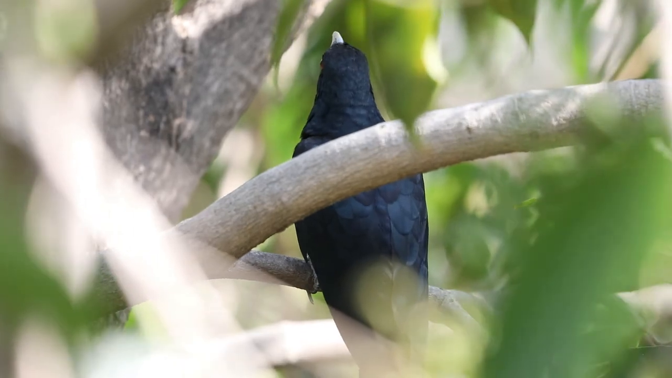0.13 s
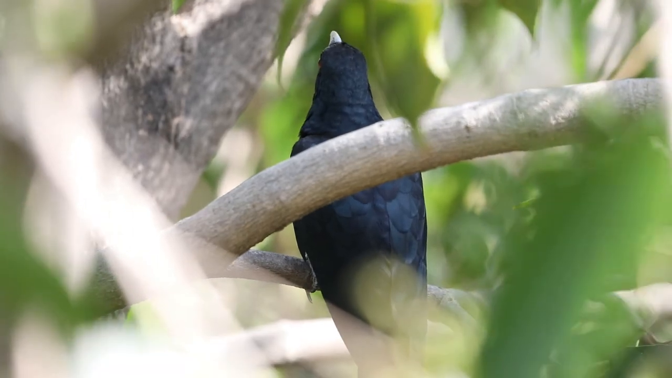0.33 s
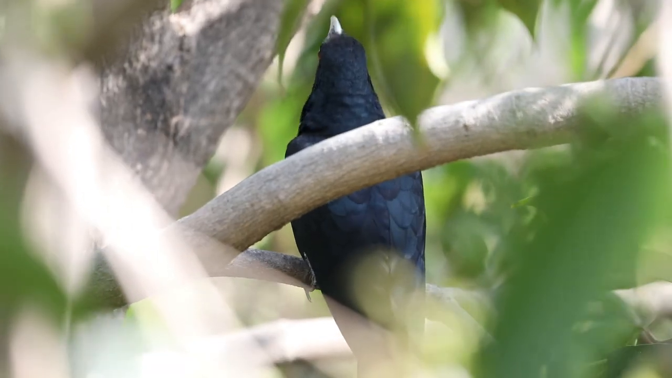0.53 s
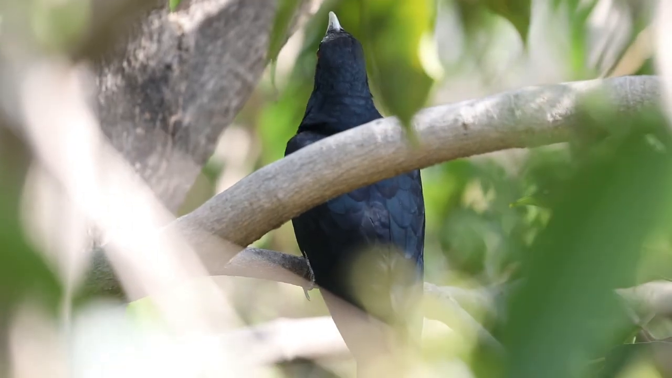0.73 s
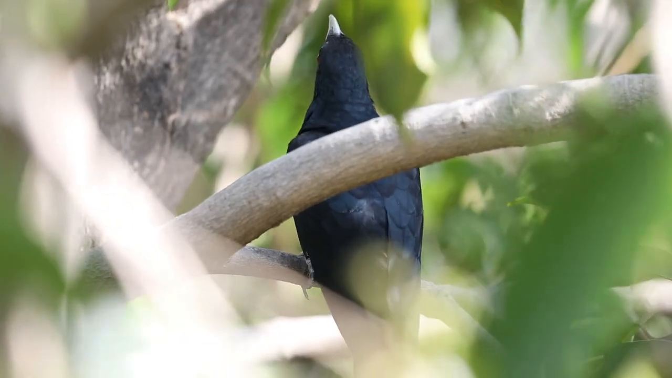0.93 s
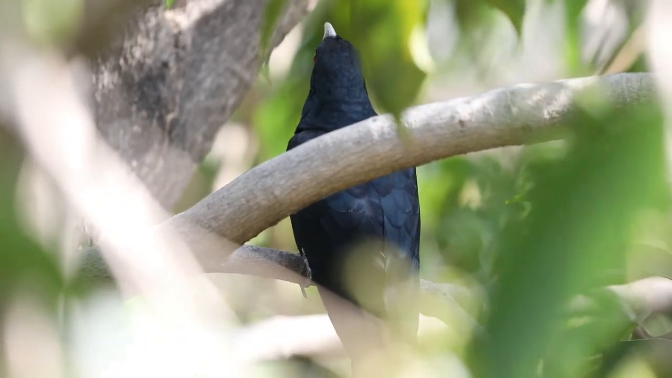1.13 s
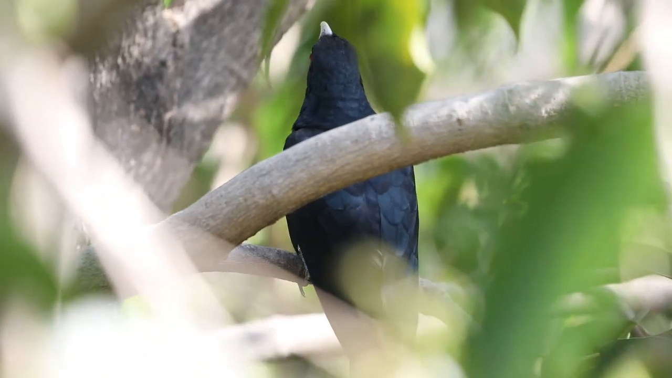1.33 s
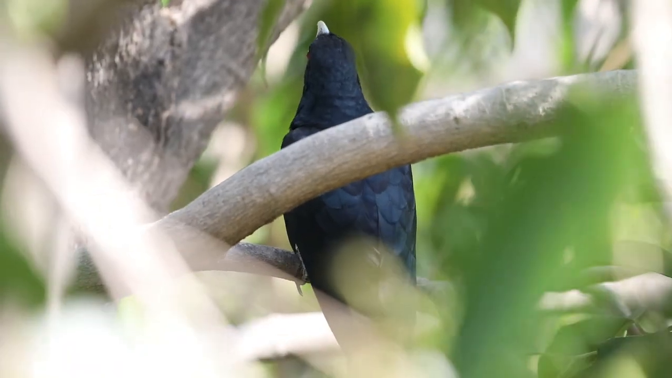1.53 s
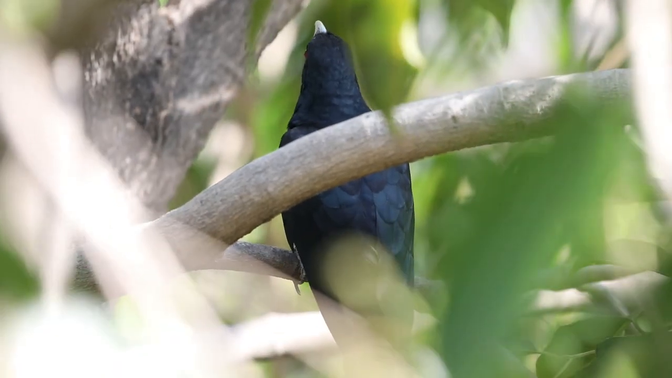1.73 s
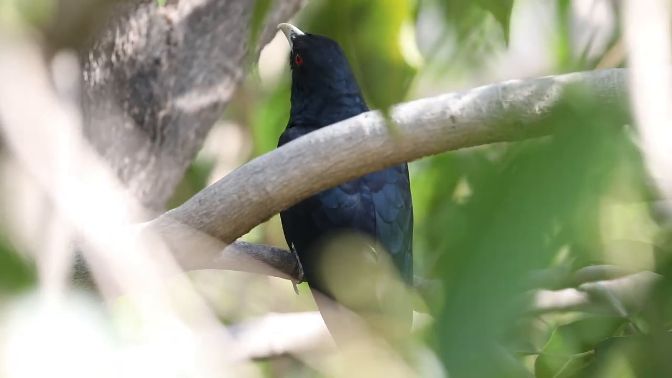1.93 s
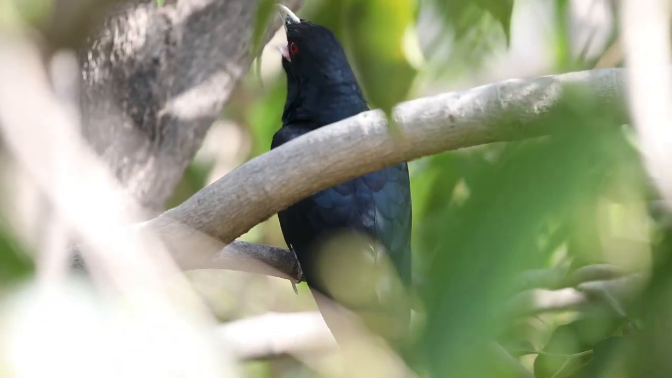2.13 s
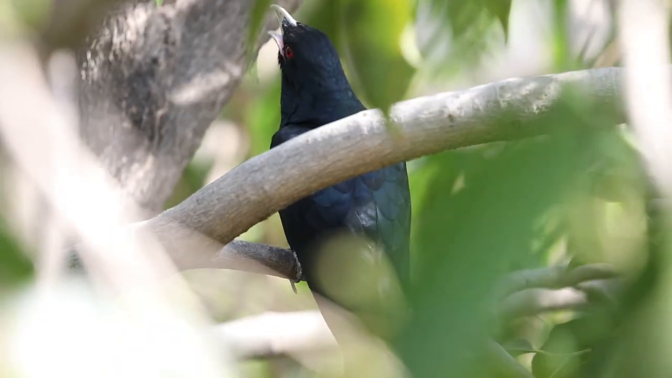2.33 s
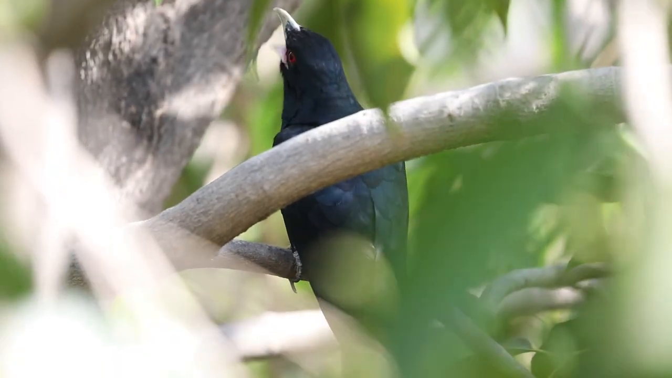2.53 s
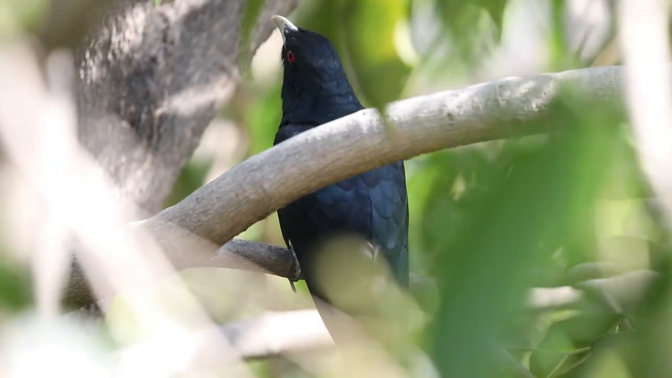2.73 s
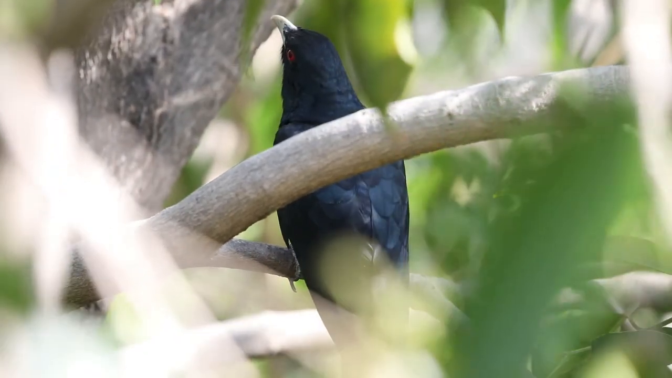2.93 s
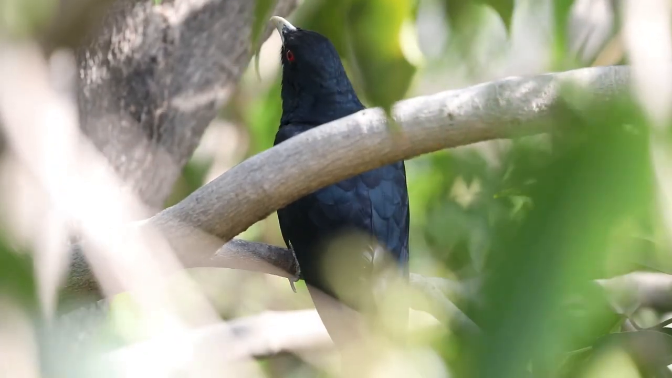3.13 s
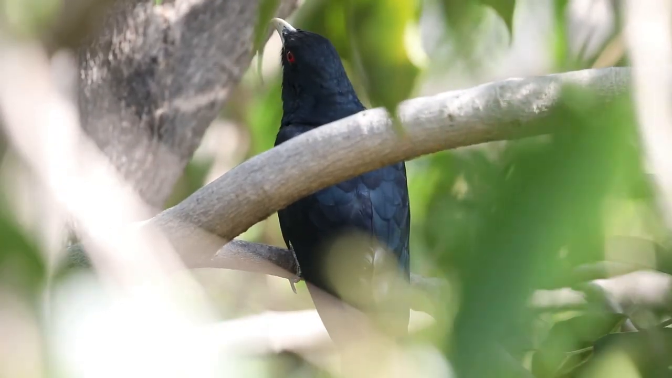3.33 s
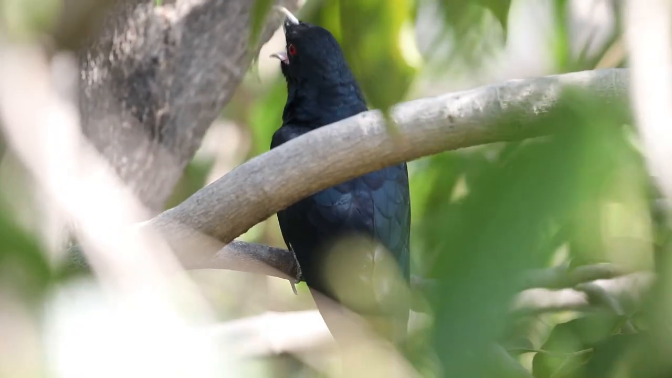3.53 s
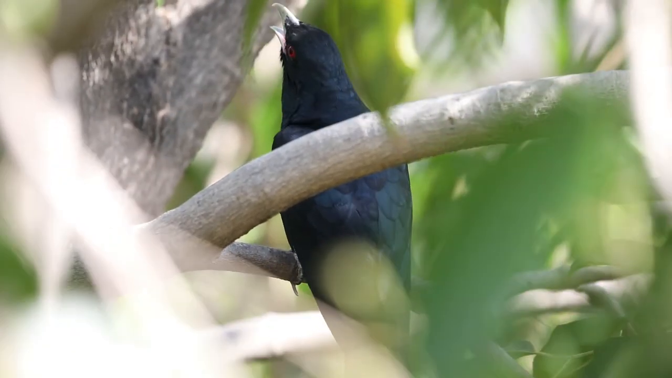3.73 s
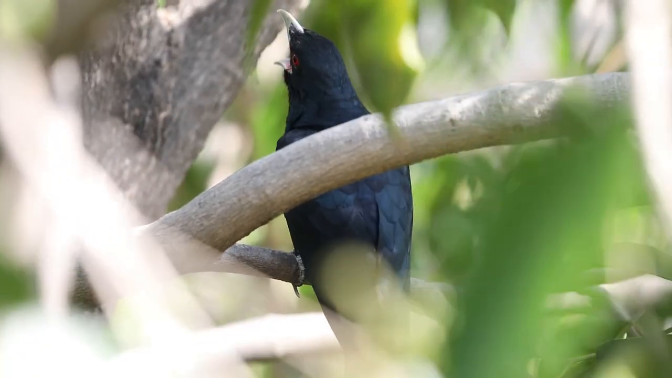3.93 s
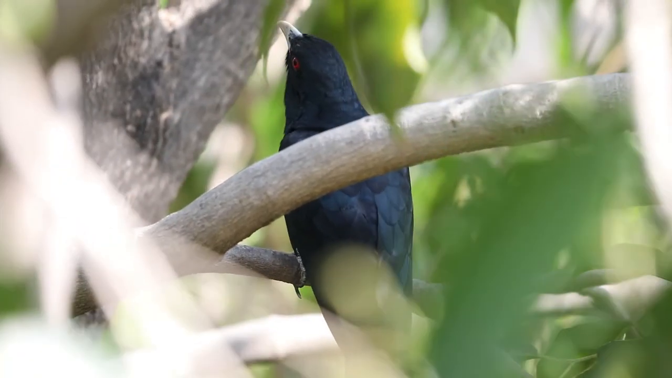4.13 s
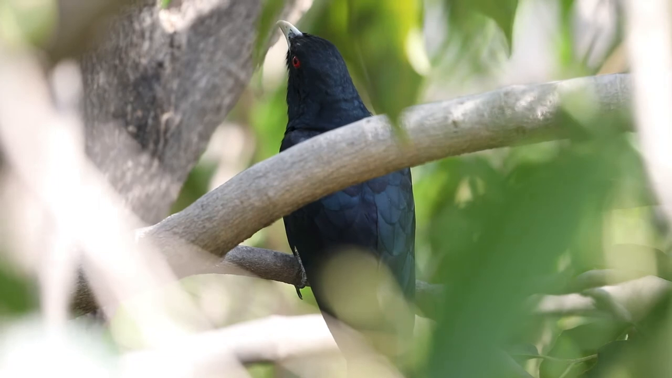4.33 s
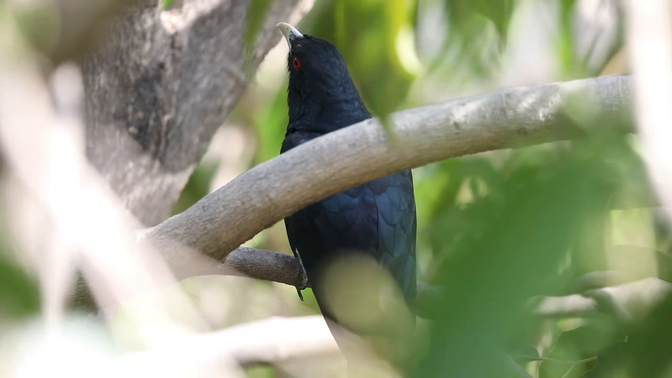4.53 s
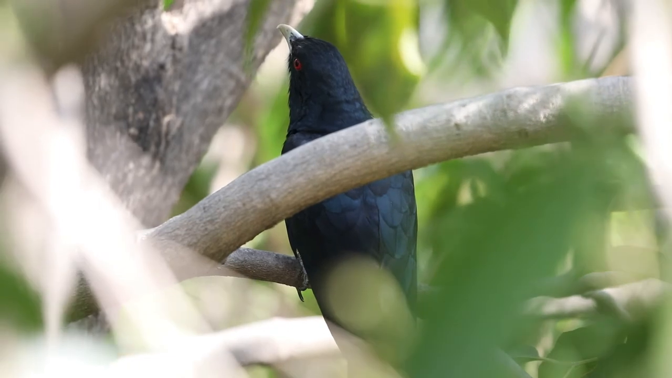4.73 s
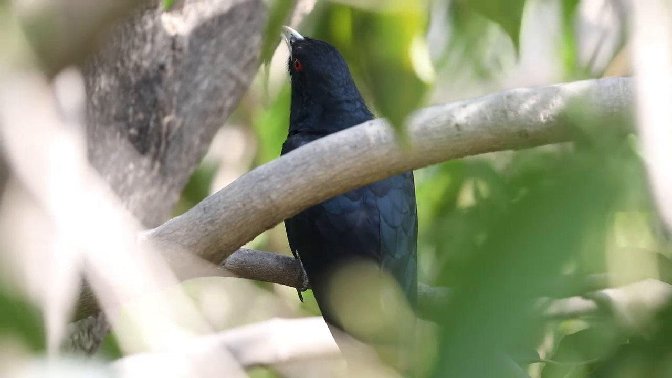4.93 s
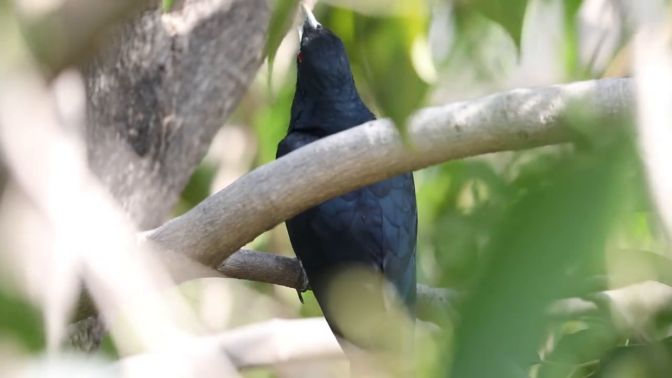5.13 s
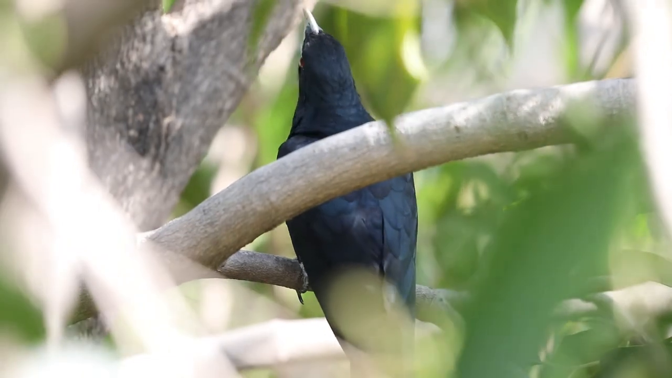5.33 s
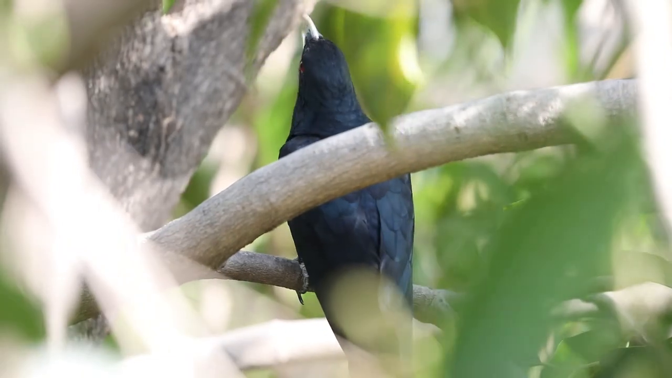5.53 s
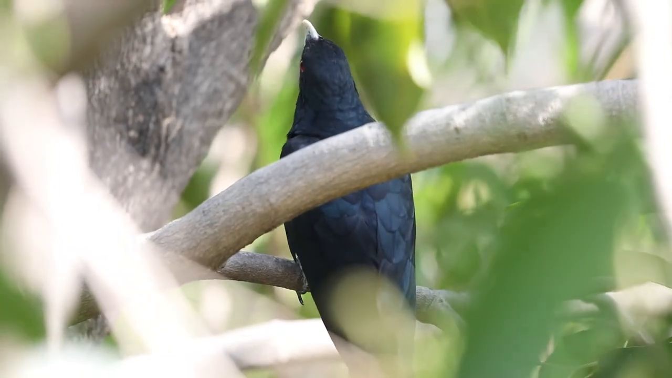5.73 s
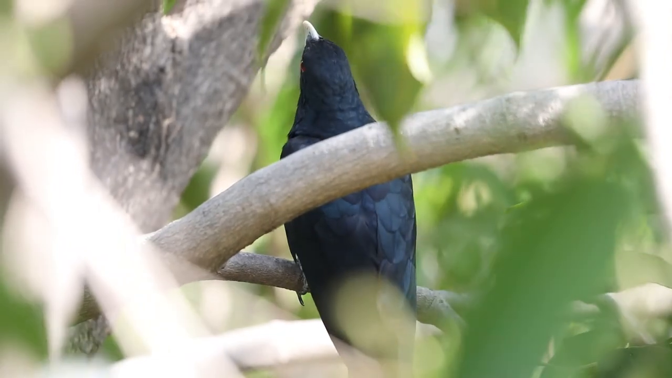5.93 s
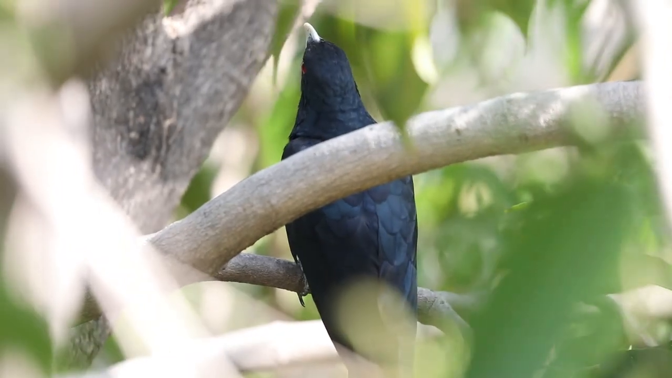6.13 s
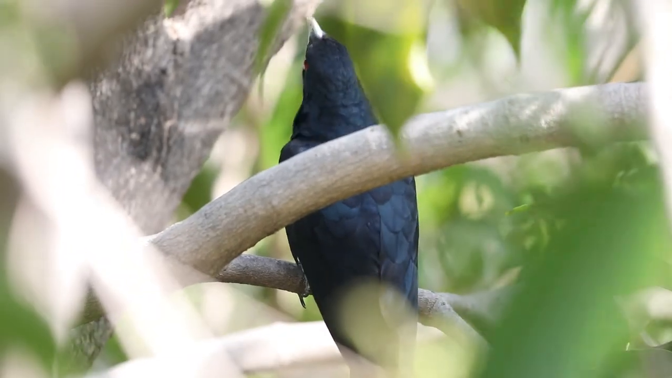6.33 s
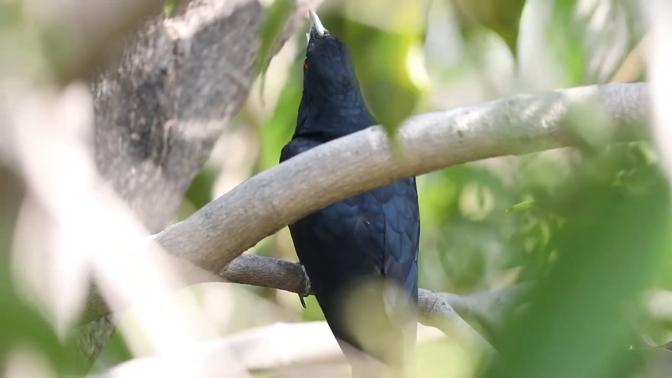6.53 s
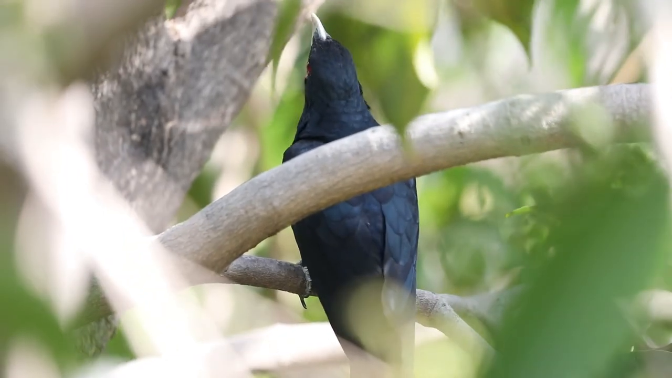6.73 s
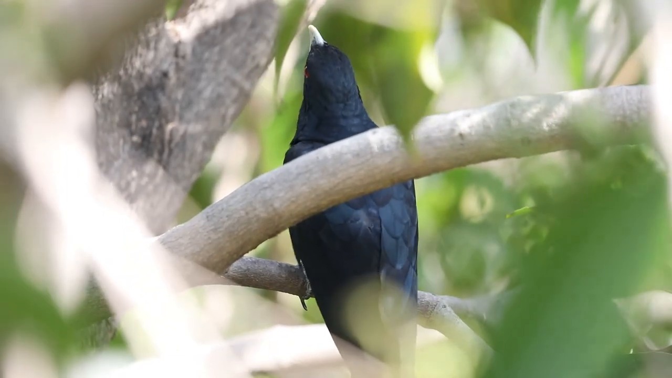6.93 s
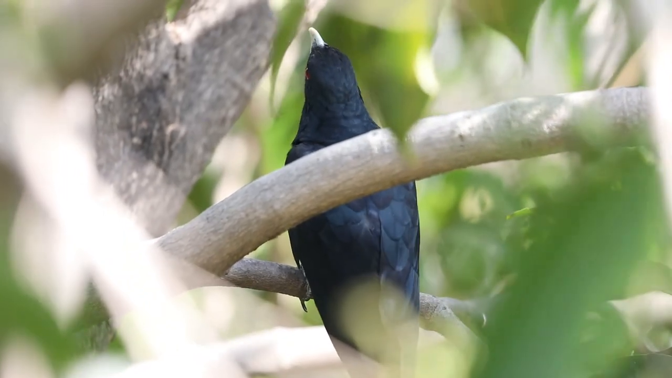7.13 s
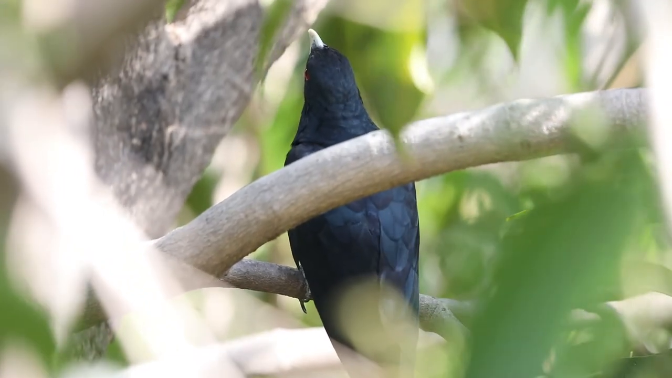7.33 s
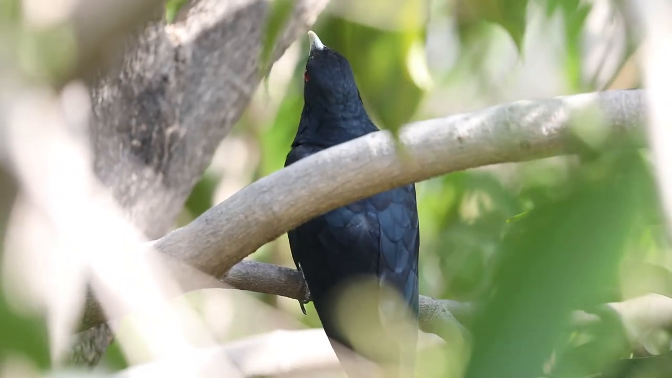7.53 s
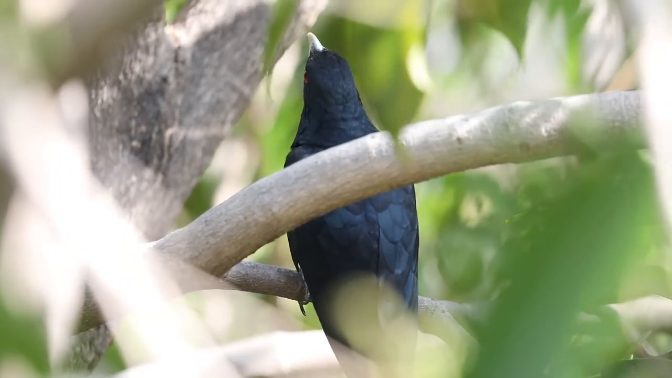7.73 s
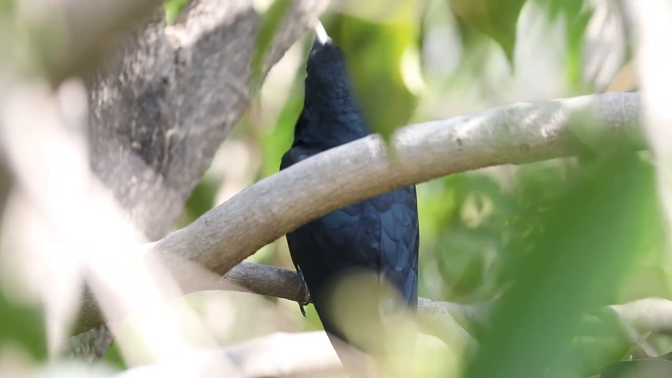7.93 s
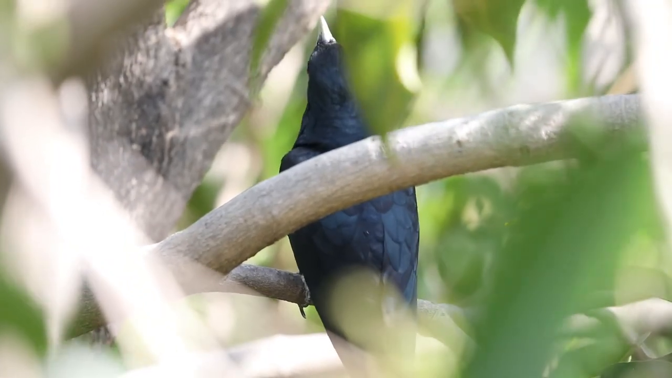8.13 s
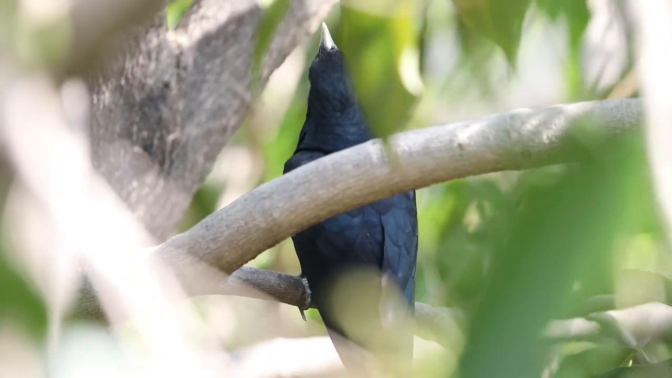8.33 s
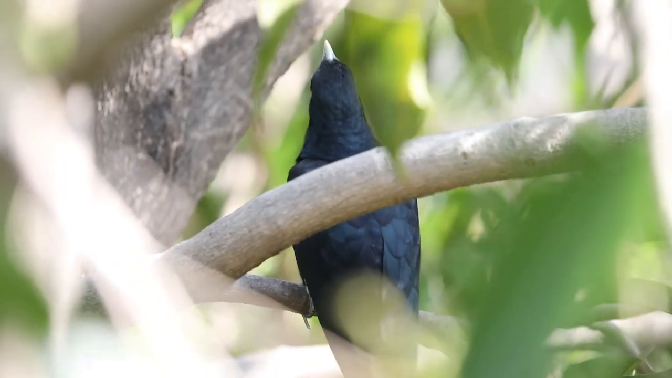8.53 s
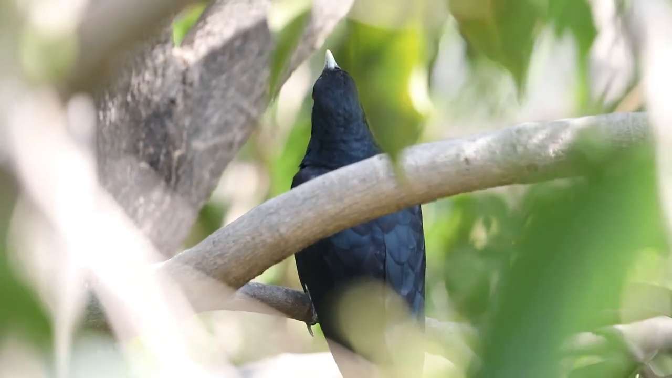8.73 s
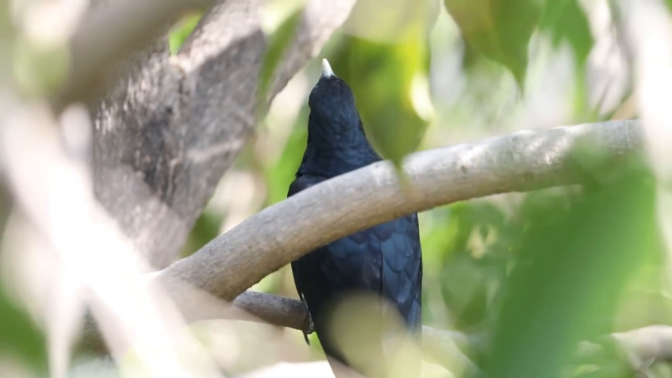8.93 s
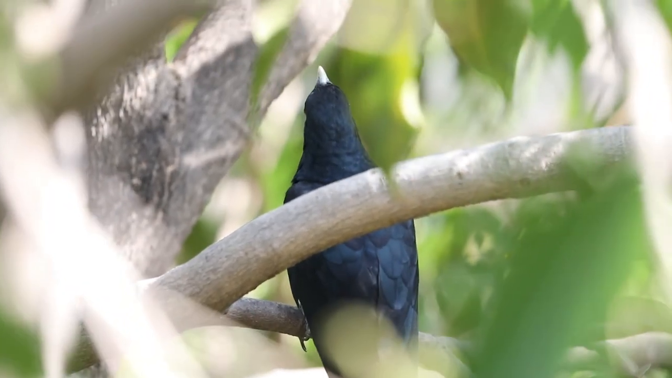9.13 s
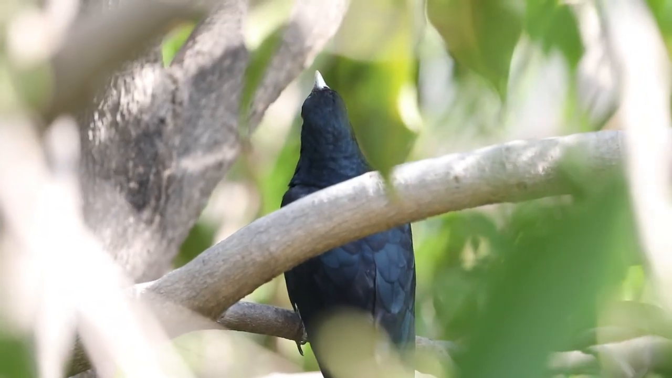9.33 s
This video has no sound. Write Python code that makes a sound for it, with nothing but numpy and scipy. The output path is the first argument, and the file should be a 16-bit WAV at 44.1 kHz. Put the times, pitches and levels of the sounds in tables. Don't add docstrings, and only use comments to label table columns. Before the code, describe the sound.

A town yard with steady soft street hum, faint bright leaf rustle in gusts and blurred, hoarse crow caws far away. Chicks peep from the start, quick sliding notes nearby until about 1.7 s, with duller ones behind a wall throughout. A koel in the tree calls loudly at 0.65 s: a clear whistle around 1.3 kHz that dips, then climbs to about 1.55 kHz and falls away. Calls follow at 2.2, 3.7, 5.2, 6.5 and 8.1 s, gradually higher, with stronger first notes and bright overtones. The first and third are longer; the others break into a short hoarse, hissing crack. A distant-sounding horn buzzes briefly at 3.3 s. From 7 s near chicks peep regularly again, and a thin motor whine slowly sinks, nearest around 8.2 s. Walls add short dull echoes and a faint diffuse tail.

```python
import sys
import numpy as np
from scipy import signal
from scipy.fft import rfft, irfft
from scipy.io import wavfile

SR = 44100
rng = np.random.default_rng(int(sys.argv[2]) if len(sys.argv) > 2 else 0)


def digitize_waveform(pressure):
    field = np.atleast_2d(pressure).T
    bounded = np.clip(field, -1, 1)
    quanta = np.round(bounded * 32767).astype(np.int16)
    wavfile.write(sys.argv[1], SR, quanta)


def volts(x):
    e = np.asarray(x, float) / 20
    return 10 ** e


N = 412776


def rms_one(x):
    return x / np.sqrt(np.mean(x ** 2) + 1e-20)


def at_hz(points, hz):
    table_hz, value = np.array(points).T
    return np.interp(np.log(hz), np.log(table_hz), value)


def span(start_s, end_s):
    part = slice(max(int(start_s * SR), 0), min(int(end_s * SR), N))
    return part, np.arange(part.start, part.stop) / SR


def soft_ends(t, rise_s, fall_s):
    return np.clip(np.minimum((t - t[0]) / rise_s, (t[-1] - t) / fall_s), 0, 1) ** 2


def drift(rate_hz):
    r = np.exp(-80 * np.pi * rate_hz / SR)
    slow = signal.lfilter([1], [1, -2 * r, r * r], rng.standard_normal(N // 40 + 2002))[2000:]
    return np.interp(np.arange(N) / 40, np.arange(len(slow)), rms_one(slow))


def coloured(points):
    hz = np.maximum(np.fft.rfftfreq(N, 1 / SR), 1)
    spectrum = rfft(rng.standard_normal(N)) * volts(at_hz(points, hz))
    return rms_one(irfft(spectrum, N))


def resonate(x, hz, width_hz):
    r = np.exp(-np.pi * width_hz / SR)
    poles = [1, -2 * r * np.cos(2 * np.pi * hz / SR), r * r]
    return signal.lfilter([(1 - r * r) / 2, 0, (r * r - 1) / 2], poles, x)


def stack(pitch_hz, colour, patchy_db, count):
    phase = 2 * np.pi * np.cumsum(pitch_hz) / SR
    knots = rng.standard_normal((count, len(pitch_hz) // 500 + 2))
    out = 0
    for k in range(1, count + 1):
        patch = np.interp(np.arange(len(pitch_hz)) / 500, np.arange(knots.shape[1]), knots[k - 1])
        level_db = at_hz(colour, k * pitch_hz) + patchy_db * patch
        out = out + np.sqrt(2) * volts(level_db) * np.sin(k * phase + k * k)
    return out


def swells(rows, narrow):
    t = np.arange(N) / SR
    return sum(volts(level_db) * np.exp(-(narrow * (t - middle_s) / length_s) ** 2)
               for middle_s, length_s, level_db in rows)


def street():
    # (frequency [Hz], density [dB per Hz])
    hum = [(20, -39), (50, -22), (80, -32), (110, -20), (170, -8), (260, -7), (420, -8.5), (780, -6.5),
           (950, -3), (1400, -3.5), (2010, -5.5), (3800, -27), (5000, -30), (7300, -21), (11000, -33.5),
           (13000, -53)]
    # (time [s], level [dB])
    traffic = [
        (0.0, -66),
        (1.5, -63),
        (3.6, -60),
        (6.5, -61),
        (7.2, -59.5),
        (9.36, -62.5),
    ]
    time_s, level_db = np.transpose(traffic)
    return coloured(hum) * volts(np.interp(np.arange(N) / SR, time_s, level_db) + 5.0)


def leaves():
    # (frequency [Hz], density [dB per Hz])
    rustle = [(1500, -31), (3000, 4), (5000, -6.5), (7500, -8), (10000, -12.5), (12000, -12.5),
              (13500, -18), (15500, -50)]
    # (middle [s], length [s], level [dB])
    gusts = [
        (0.1, 1.6, -64.5),
        (1.8, 0.23, -68),
        (2.8, 0.73, -79),
        (3.6, 0.59, -67),
        (4.78, 0.24, -64),
        (5.25, 1.1, -72.5),
        (5.9, 0.26, -68),
        (6.9, 2.1, -75.5),
        (8.1, .7, -65.5),
        (9.36, 0.25, -63),
    ]
    calm_db = -78
    return coloured(rustle) * (volts(calm_db) + swells(gusts, narrow=2)) * volts(2.5 * drift(14))


def crows():
    # (frequency [Hz], width [Hz], level [dB])
    throat = [(1536, 115, 2), (1893, 240, 4.5), (2350, 54, -0.5)]
    # (middle [s], length [s], level [dB])
    caws = [(0.328, 0.52, -56), (0.874, 0.67, -60), (1.547, 0.33, -55), (2.109, 0.38, -56.5),
            (2.717, 0.57, -60), (3.166, 0.3, -52), (3.71, 0.32, -53.5), (4.333, 0.66, -58),
            (4.95, 0.55, -75), (5.85, 0.65, -63), (7.097, 0.22, -66), (7.446, 0.53, -55),
            (7.963, 0.98, -60.5), (8.645, 0.58, -58), (9.3, 0.21, -64)]
    rough = rng.standard_normal(N) * volts(0.54 * drift(25))
    voice = 0
    for hz, width_hz, gain_db in throat:
        voice = voice + volts(gain_db) * resonate(resonate(rough, hz, width_hz), hz, width_hz)
    return rms_one(voice) * swells(caws, narrow=3.2)


def motor():
    start_s, nearest_s = 6.9, 8.15
    start_hz, sink_hz_per_s = 1255, 30
    nearest_db, fade_db_per_s2 = -56, 7.5
    out = np.zeros(N)
    part, t = span(start_s, N / SR)
    u = t - start_s
    pitch_hz = start_hz - sink_hz_per_s * u * (1 + u / 3)
    phase = 2 * np.pi * np.cumsum(pitch_hz * (1 + .004 * drift(12)[part])) / SR
    level_db = nearest_db - fade_db_per_s2 * (t - nearest_s) ** 2
    out[part] = volts(level_db + 2.5 * drift(8)[part]) * np.sin(phase) * soft_ends(t, .2, .001)
    return out


def horn():
    # (frequency [Hz], level [dB])
    bell = [(400, -13), (800, -30), (2000, -28), (2415, -12), (2820, -4), (3220, -10), (3625, 0),
            (4030, -11), (4600, -32), (7000, -38), (10200, -20), (12000, -26), (13000, -50)]
    start_s, length_s, settle_s = 3.317, .215, 0.01305
    horn_hz, scoop = 401.6, 0.043
    horn_db, blat_db, release_db_per_s = -52, 3, 484
    out = np.zeros(N)
    part, t = span(start_s, start_s + length_s + .1)
    starting = np.exp(-(t - start_s) / settle_s)
    level_db = horn_db + blat_db * starting - release_db_per_s * np.maximum(t - start_s - length_s, 0)
    wobble = 1 + .003 * drift(25)[part] + .004 * drift(150)[part]
    buzz = stack(horn_hz * (1 - scoop * starting) * wobble, bell, 3.2, count=34)
    out[part] = volts(level_db) * buzz * soft_ends(t, .002, .02)
    return out


def chicks(peeps, sag_per_s, slide_bend, jump, hoarse, patchy_db):
    # (frequency [Hz], level [dB])
    peep_beak = [(600, -53), (1900, -18), (2400, -2.5), (3000, 0), (4200, -1.5), (5500, -7.5), (7500, -5.5),
                 (10000, -8), (12500, -25.5), (15500, -32)]
    out = np.zeros(N)
    breath = coloured(peep_beak)
    waver = 1 + .009 * drift(60)
    for start_s, length_s, top_hz, level_db, rise_share in peeps:
        part, t = span(start_s, start_s + length_s)
        u = (t - start_s) / length_s
        sliding = np.clip((u - rise_share) / (1 - rise_share), 0, 1) ** slide_bend
        slide = sliding * sag_per_s * length_s * (1 - rise_share)
        pitch_hz = top_hz * (1 - jump * np.clip(1 - u / rise_share, 0, 1) ** 4.0 - slide)
        effort = volts(level_db - 2.4 * np.clip(1 - u / 0.59, 0, 1)) * soft_ends(t, 0.0014, 0.021)
        voice = stack(pitch_hz * waver[part], peep_beak, patchy_db, count=7)
        out[part] += effort * (voice + hoarse * breath[part])
    return out


def breaks():
    # (frequency [Hz], level [dB])
    break_hiss = [(500, -60), (1200, -3), (2000, 7), (3000, -3), (4000, -3.5), (5200, -6), (6200, -2.5),
                  (7500, -2.5), (10500, 0), (13000, -11.5), (15500, -27)]
    # (start [s], length [s], level [dB], throat start [Hz], throat end [Hz])
    hoarse_ends = [
        (2.499, 0.18, -49, 2330, 1750),
        (5.461, 0.14, -47, 2420, 1863),
        (6.792, 0.14, -43.5, 2413, 1810),
        (8.381, 0.14, -46, 2383, 1793),
    ]
    out = np.zeros(N)
    hiss = coloured(break_hiss)
    lowpass = signal.butter(2, 140, fs=SR, output="sos")
    rasp = rms_one(signal.sosfilt(lowpass, rng.standard_normal(N)))
    for start_s, length_s, level_db, from_hz, to_hz in hoarse_ends:
        part, t = span(start_s - .04, start_s + length_s)
        u = np.clip((t - start_s) / length_s, 0, 1)
        bend = ((u - .35) / .65) ** 2 * np.where(u < .35, -.5, 1.2)
        throat_hz = from_hz + (to_hz - from_hz) * bend
        throat = np.sin(2 * np.pi * np.cumsum(throat_hz) / SR) * rasp[part]
        throat = throat * np.clip((t - start_s) / .022, 0, 1)
        out[part] += volts(level_db - 1.3 * u) * soft_ends(t, 0.049, 0.065) * hiss[part]
        out[part] += volts(level_db + 4.5 - 0.69 * u) * soft_ends(t, .01, 0.0053) * throat
    return out


def koel_pitch(u, dip_hz, crest_hz, climb_from_s, crest_s):
    fall_hz_per_s, fall_round_s = 4700, 0.049
    overshoot = .12 * np.exp(-((u - .02) / .034) ** 2)
    scoop = .12 * np.exp(-u / 0.0071)
    climb = np.sin(np.pi / 2 * np.clip((u - climb_from_s) / (crest_s - climb_from_s), 0, 1)) ** 3.0
    fall = fall_hz_per_s * (np.hypot(np.maximum(u - crest_s, 0), fall_round_s) - fall_round_s)
    return dip_hz * (1 + overshoot - scoop) + (crest_hz - dip_hz) * climb - fall


def koel():
    # (start [s], end [s], level of half-way lines [dB])
    doubling = [
        (0.707, 0.863, -55.5),
        (2.311, 2.425, -56.5),
        (3.84, 3.97, -55),
    ]
    # (start [s], length [s], dip pitch [Hz], crest pitch [Hz], first note against second [dB])
    calls = [
        (0.654, 0.52, 1267, 1548, -5.5),
        (2.225, 0.3, 1311, 1599, -1.5),
        (3.682, 0.51, 1315, 1654, -2.0),
        (5.166, .31, 1331, 1715, -2.5),
        (6.502, .306, 1368, 1781, 0.0),
        (8.085, .306, 1366, 1783, -0.5),
    ]
    # (pitch [Hz], level [dB])
    whistle_by_pitch = [(1000, -39), (1270, -34), (1320, -30.5), (1365, -28.5), (1450, -26.5),
                        (1560, -28.5), (1760, -27.5)]
    # (pitch [Hz], level [dB])
    overtones_by_pitch = [(1000, -80), (1150, -59), (1270, -65), (1360, -63), (1450, -59), (1650, -57),
                          (1760, -51)]
    # (frequency [Hz], level against overtone level [dB])
    koel_beak = [(1800, 3), (2700, -7.5), (3300, -10), (4100, -14), (5200, -3), (6200, 3.5), (7000, 3),
                 (8500, -3), (10300, -2), (12500, -7.5), (15500, -25)]
    overtones, climb_from_s, crest_s = 11, .13, .332
    attack_s, attack_db, overtone_attack_db = 0.035, -27.5, -25
    fade_from_s, fade_db_per_s = 0.37, 138
    out, half = np.zeros(N), np.zeros(N)
    tremor = 1 + .0016 * drift(60)
    for start_s, end_s, level_db in doubling:
        part, t = span(start_s, end_s)
        half[part] = volts(level_db) * soft_ends(t, 0.012, 0.012)
    for start_s, length_s, dip_hz, crest_hz, first_db in calls:
        part, t = span(start_s, start_s + length_s)
        u = t - start_s
        pitch_hz = koel_pitch(u, dip_hz, crest_hz, climb_from_s, crest_s) * tremor[part]
        phase = 2 * np.pi * np.cumsum(pitch_hz) / SR
        rising = np.clip(1 - u / attack_s, 0, 1) ** 2
        breath_db = -fade_db_per_s * np.maximum(u - fade_from_s, 0)
        held_back_db = first_db * np.clip((crest_s - u) / (crest_s - climb_from_s), 0, 1)
        whistle_db = breath_db + held_back_db + at_hz(whistle_by_pitch, pitch_hz) + attack_db * rising
        voice = np.sqrt(2) * volts(whistle_db) * np.sin(phase)
        over_db = breath_db + at_hz(overtones_by_pitch, pitch_hz) + overtone_attack_db * rising
        voice += volts(over_db) * stack(pitch_hz, [(1760, -64), *koel_beak], 5.05, count=overtones)
        for k in np.arange(1.5, overtones):
            line_db = at_hz(koel_beak, k * pitch_hz) - 7 + 5.6 * (k < 2)
            voice += half[part] * volts(line_db) * np.sin(k * phase)
        out[part] += voice * soft_ends(t, 0.0031, 0.0039)
    return out


def yard(near, hidden):
    # (frequency [Hz], level [dB])
    tail_colour = [(500, -2), (1500, -4.5), (3000, 3), (6000, 3), (12000, 0)]
    # (frequency [Hz], t60 [s])
    tail_decay = [(500, 1), (1500, 0.93), (3000, 0.77), (6000, 0.66), (12000, 0.46)]
    # (delay [s], level [dB])
    walls = [
        (.017, -7.5),
        (0.041, -18),
        (.075, -17.5),
        (.12, -20.5),
    ]
    tail_db, wall_cut_hz = -84.5, 4600
    t = np.arange(SR) / SR
    white = rng.standard_normal((2, SR))
    tail = 0
    for k, hz in enumerate(np.geomspace(400, 14000, 11)):
        bandpass = signal.butter(2, [hz / 1.17, hz * 1.34], "band", fs=SR, output="sos")
        band = rms_one(signal.sosfilt(bandpass, white[k % 2]))
        level_db = at_hz(tail_colour, hz) - 60 * t / at_hz(tail_decay, hz)
        tail = tail + band * np.sqrt(hz) * volts(level_db)
    response = tail * np.clip(t / 0.0013, 0, 1) * volts(tail_db)
    echoes = np.zeros(SR)
    for delay_s, echo_db in walls:
        echoes[int(delay_s * SR)] = volts(echo_db)
    response += signal.lfilter(*signal.butter(2, wall_cut_hz, fs=SR), echoes)
    muffled = volts(-1.0) * signal.lfilter(*signal.butter(1, 5500, fs=SR), hidden)
    return near + muffled + signal.fftconvolve(near + hidden, response)[:N]


def scene():
    # (start [s], length [s], top pitch [Hz], level [dB], share spent jumping up [0-1])
    near_peeps = [(0.0, 0.052, 1823, -60.5, 0.054), (0.132, 0.15, 2423, -56.5, 0.13),
                  (.415, 0.13, 2378, -55, 0.16), (0.673, 0.12, 2404, -55, 0.24),
                  (1.235, .143, 2606, -53.5, 0.21), (1.58, 0.135, 2510, -54.5, 0.22),
                  (7.018, 0.11, 2466, -55, 0.16), (7.255, 0.12, 2240, -54.5, 0.23),
                  (7.503, 0.13, 2267, -55, 0.26), (7.772, 0.12, 2193, -56.5, 0.25),
                  (8.029, 0.12, 2260, -59, 0.18), (9.205, .14, 2640, -59, 0.23)]
    # (start [s], length [s], top pitch [Hz], level [dB], share creeping up [0-1])
    far_peeps = [(.10, 0.13, 2370, -58.5, 0.38), (.385, 0.12, 2376, -58, 0.34),
                 (2.225, 0.099, 2396, -56, 0.12), (2.74, 0.12, 2384, -59.5, 0.22),
                 (3.03, 0.11, 2364, -59, 0.31), (3.655, 0.16, 2516, -60.5, 0.39),
                 (4.688, 0.075, 2310, -59, 0.079), (5.085, 0.14, 2367, -59.5, 0.33),
                 (5.795, 0.13, 2410, -59.5, 0.3), (7.95, 0.093, 2350, -55.5, 0.24),
                 (8.04, 0.092, 2350, -55, 0.25), (8.305, 0.086, 2307, -51, 0.41)]
    # (start [s], length [s], top pitch [Hz], level [dB], rise share [0-1])
    far_chips = [
        (2.197, 0.053, 3284, -52.5, 0.45),
        (2.468, 0.045, 3320, -58, 0.38),
        (4.648, 0.077, 3250, -55, .3),
        (5.405, 0.048, 2530, -53.5, 0.4),
    ]
    near = koel() + breaks() + horn()
    near += chicks(near_peeps, sag_per_s=3.8, slide_bend=1.15, jump=0.46, hoarse=0.27, patchy_db=3.5)
    hidden = chicks(far_peeps, sag_per_s=5.4, slide_bend=1.2, jump=.1, hoarse=.7, patchy_db=4.5)
    hidden += chicks(far_chips, sag_per_s=1.5, slide_bend=1.2, jump=.04, hoarse=.4, patchy_db=4.5)
    return (yard(near, hidden) + crows() + motor() + street() + leaves())[None]


def roll_off(x):
    return signal.sosfilt(signal.butter(12, 15650, fs=SR, output="sos"), x)


def record(dry):
    # (frequency [Hz], width [Hz], depth [0-1])
    mic_dips = [(6050, 1200, .65), (8500, 700, .4), (12800, 600, .5)]
    heard = dry[0]
    for hz, width_hz, depth in mic_dips:
        heard = heard - np.clip(depth, 0, 1) * resonate(heard, hz, width_hz)
    return roll_off(heard[None])


dry = scene()
out = record(dry)
digitize_waveform(out)
```